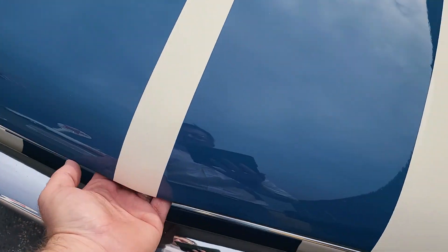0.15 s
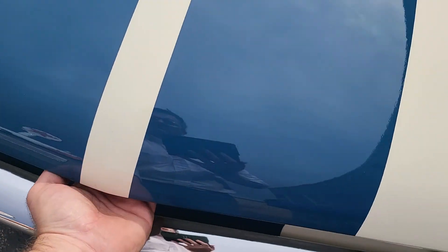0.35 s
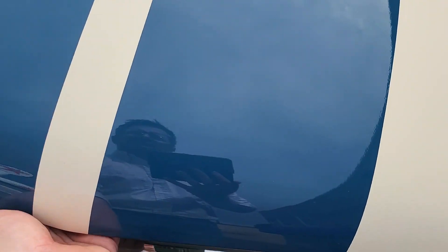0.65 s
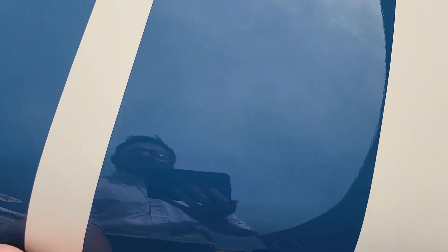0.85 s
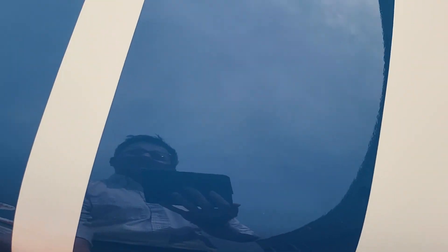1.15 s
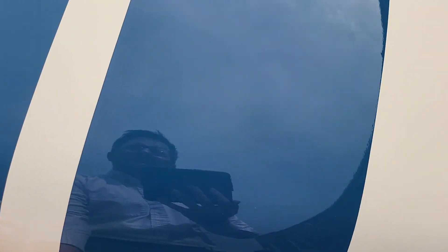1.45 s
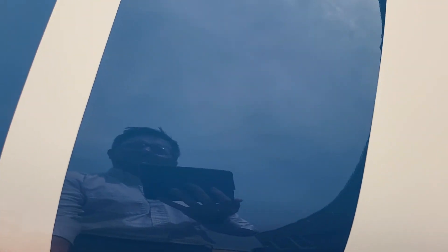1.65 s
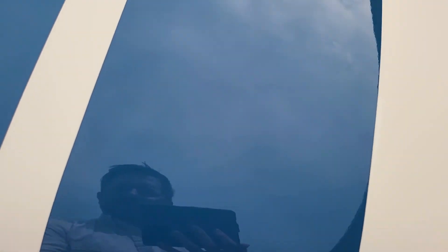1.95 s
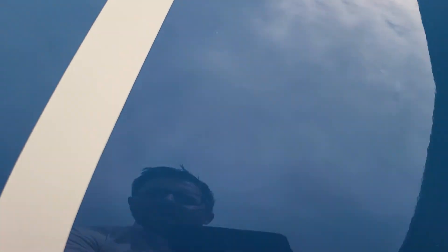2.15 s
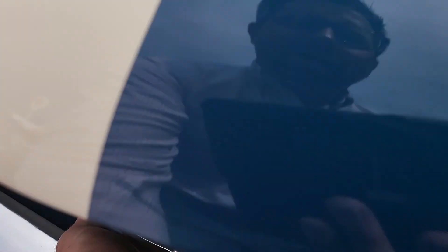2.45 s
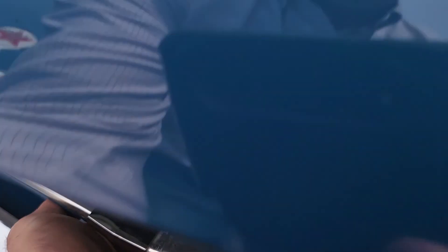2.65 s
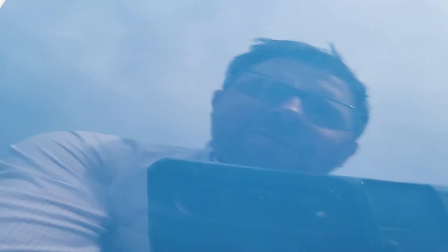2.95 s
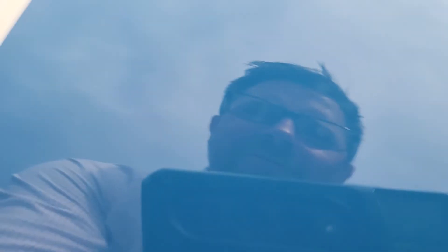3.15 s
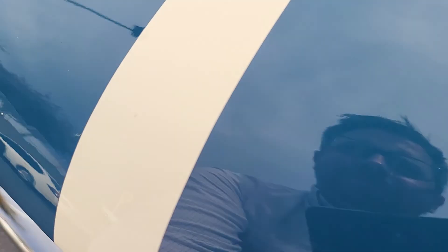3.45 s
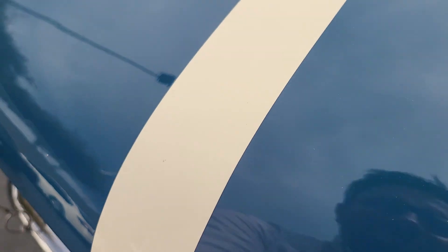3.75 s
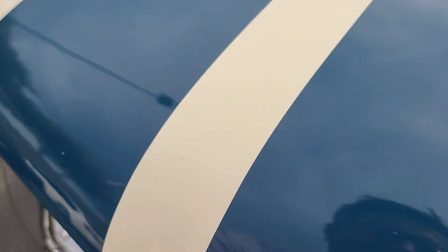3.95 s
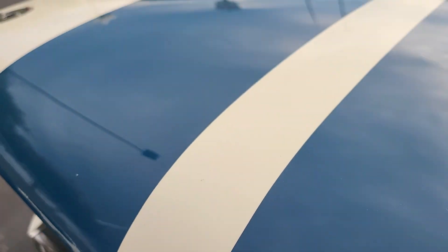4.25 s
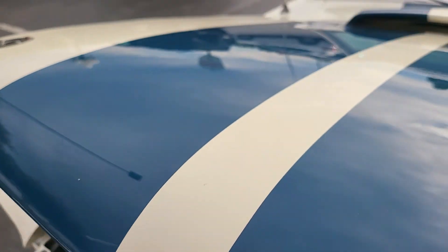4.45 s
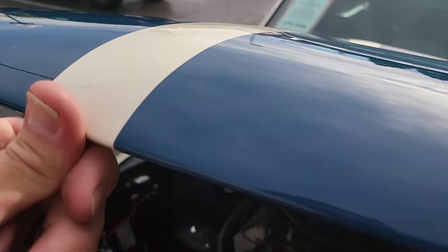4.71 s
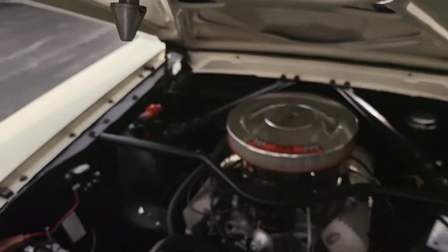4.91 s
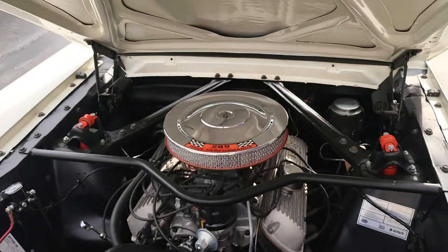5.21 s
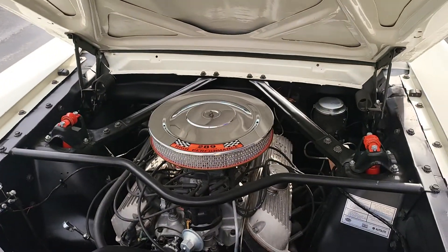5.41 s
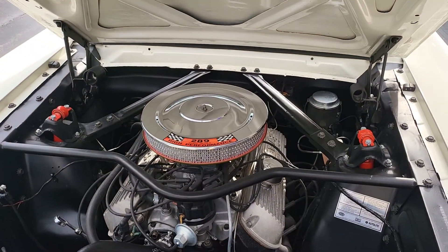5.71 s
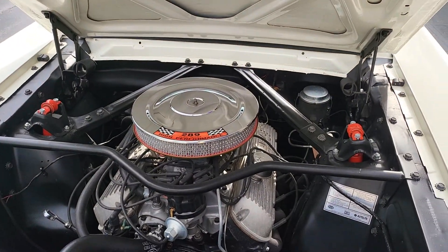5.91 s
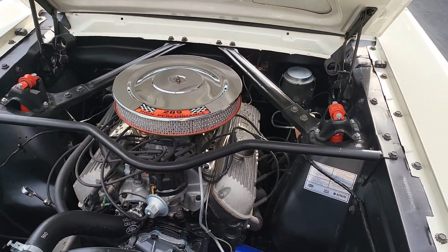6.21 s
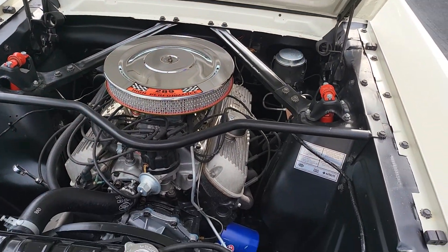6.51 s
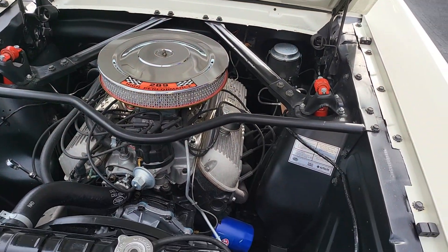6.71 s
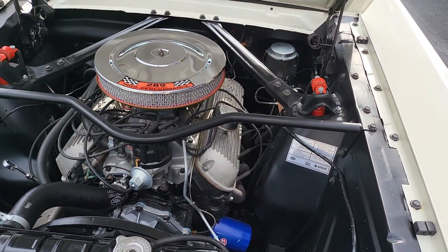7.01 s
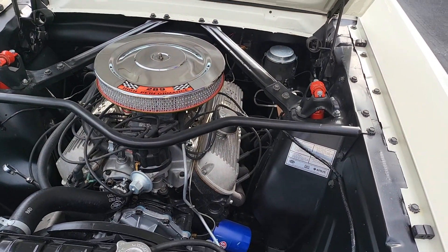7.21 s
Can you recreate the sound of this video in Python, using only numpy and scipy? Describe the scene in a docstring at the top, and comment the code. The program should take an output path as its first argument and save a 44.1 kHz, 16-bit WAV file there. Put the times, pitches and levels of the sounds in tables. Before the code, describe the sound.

Outdoors, a distant engine drones over faint traffic hiss and low wind rumble. Close to the microphone, fingers rub and scrape along a steel car hood with a few soft knocks. A cluster of loud, ringing clunks follows as the latch is worked. It squeaks faintly, then releases with a sharp metallic clack. Soft handling thumps accompany the lift, and one more ringing clunk sounds as the hood reaches the top.

```python
"""Outdoors, a hand feels under the edge of a steel car hood, works the latch and lifts the hood.
A distant engine drones over faint traffic hiss and low wind rumble. Fingers rub the metal, and low
thumps come through the hand and microphone. Each knock rings the big panel: a few clear tones over a
wash of crowded ones. Small latch parts ping when struck, and the latch squeaks as it sticks and slips."""
import sys
import numpy as np
from scipy import signal
from scipy.io import wavfile

SR = 44100
rng = np.random.default_rng(int(sys.argv[2]) if len(sys.argv) > 2 else 0)


def generate_wav(sig):
    """Save sig (samples, or channels by samples) to the path in sys.argv[1] as 16-bit PCM at SR."""
    pcm = np.round(np.clip(np.atleast_2d(sig).T, -1, 1) * 32767).astype(np.int16)
    wavfile.write(sys.argv[1], SR, pcm)


N = 325017
HOOD_FREE_S = 3.9   # the latch holds the hood until then; once free, it rings differently

# Knocks on latch and hood; weaker bursts just after the loud ones briefly hold the ringing level.
# start_s, thud_db, thud_octaves (above 100 Hz), click_db, click_treble_db, left_over_right_db, ring_factor
KNOCKS = [(0.425, -56, 1.4, -40.5, -19, 5, 0.33), (0.848, -25.5, 2, -48, -15, 1, 0.62),
          (1.091, -39.5, 1.8, -56, -11, 4.5, 1.06), (1.687, -56, 2.4, -49, -7, 4, 0.34),
          (1.79, -40, 3.3, -43, -25, 0, 0.63), (1.848, -52, 5.9, -43, -21, 1, .5),
          (2.439, -60, 1.1, -51.5, -1, 10, .09), (2.864, -21.5, 2, -29, -49, 1, 0.66),
          (2.999, -24.5, 1.18, -47, -43, 2, 1.07), (3.063, -19.5, 1.22, -68, -19, 0.5, 1.57),
          (3.174, -11, 1.9, -30, -14, 4, 0.64), (3.18, -11, 2.37, -18, -14, 2.5, 0.99),
          (3.2, -23.5, 1.9, -24, -36, -2, 0.88), (3.247, -25, 4.5, -31, -10, 3, 0.56),
          (3.275, -22, 0.33, -48.5, -29, -3.5, 1.3), (3.382, -31, .3, -36, 1, 0, 0.17),
          (3.415, -62, .4, -62, 2.1, 3, 0.086), (3.723, -23, 1.56, -40.5, -12, -2.5, 0.63),
          (3.9995, -14, 2.8, -8.5, -4, 2.5, 0.78), (4.019, -12, 0.94, -15, -29, 0.5, 0.97),
          (4.062, -19, 1.16, -30, -14, 3, 0.75), (4.106, -36, 0.86, -41.5, -8, 2, 1.36),
          (4.595, -50, 0.36, -49.5, -2.5, -2, 0.57), (4.897, -48.5, .3, -34.5, -22, 4.5, 0.22),
          (5.029, -64, .4, -62, 11, 2, .1), (5.779, -45.5, 2.7, -57.5, -21, 3, 0.27),
          (6.034, -19, 3.37, -39.5, -8, 2.5, 0.39), (6.049, -26.5, 3, -57, -22, -0.5, 1.55),
          (6.1, -32.5, 2.7, -60, -6, -1, 0.7), (6.139, -37.5, 2.9, -70, -12, 1, 0.79),
          (7.111, -52, 4.6, -46.5, -17, 1, .45)]
# How wide the hood sounds in stereo: pitch_hz, side_over_mid_db
HOOD_WIDTH = [(60, -5), (150, -17), (380, 0), (950, 5.5), (2380, 2.5), (5980, 0.5), (15000, 0)]


def from_db(db):
    """Turn decibels into a gain."""
    return 10 ** (np.asarray(db) / 20)


def rms_one(x):
    """Scale a signal to an average power of 1."""
    return x / np.sqrt(np.mean(x ** 2) + 1e-20)


def in_time(rows):
    """Join timed points with straight lines, giving one curve per column."""
    times_s, *columns = np.transpose(rows)
    return [np.interp(np.arange(N) / SR, times_s, column) for column in columns]


def at_hz(points, hz):
    """Look up a value by pitch, sliding between the listed pitches."""
    pitches_hz, values = np.transpose(points)
    return np.interp(np.log(hz), np.log(pitches_hz), values)


def drift(rate_hz):
    """A smooth random wobble, about 1 in size."""
    pole = np.exp(-80 * np.pi * rate_hz / SR)
    slow = signal.lfilter([1], [1, -2 * pole, pole * pole], rng.standard_normal(N // 40 + 2002))[2000:]
    return np.interp(np.arange(N) / 40, np.arange(len(slow)), rms_one(slow))


def spread(mid, side, side_db):
    """Make left and right from what they share (mid) and what sets them apart (side)."""
    share = from_db(side_db)
    return np.array([mid + share * side, mid - share * side])


def noise_bands():
    """Stereo noise in slices a third of an octave wide: centre_hz, width_hz, (mid, side)."""
    edges_hz = 22 * 2 ** np.arange(0, 9.8, 1 / 3)
    noise = rng.standard_normal((2, 2, N))   # neighbouring slices take different noise
    for k, (low, high) in enumerate(zip(edges_hz, edges_hz[1:])):
        band_filter = signal.butter(2, [low, high], "band", fs=SR, output="sos")
        yield np.sqrt(low * high), high - low, rms_one(signal.sosfilt(band_filter, noise[k % 2]))


def dying(t, fade_s, rise_s):
    """A quick rise, then a fall of 60 dB every fade_s."""
    return (1 - np.exp(-t / rise_s)) * from_db(-60 * t / fade_s)


def stereo_phase(hz):
    """A tone from the hood reaches the two microphones out of step: left and right shift in radians."""
    return np.arctan(from_db(at_hz(HOOD_WIDTH, hz))) * np.array([[1], [-1]])


def engine_drone():
    """A distant engine slowly gains speed; echoes along the way make its tone lumpy."""
    # The engine's loudness: time_s, level_db
    loudness = [(0, -38), (.55, -38), (.9, -40.5), (1.5, -34.5), (2.18, -35.5), (2.42, -39), (2.7, -41.5),
                (3.0, -34), (3.7, -37.5), (4.3, -35.5), (4.7, -36), (5.45, -34), (5.67, -33), (5.8, -29.5),
                (6.14, -42), (6.3, -37), (6.8, -39), (7.26, -36), (7.37, -49)]
    start_hz, rise_hz_per_s, wander_hz = 62.25, 0.99, 0.5
    level_db, = in_time(loudness)
    hz = start_hz + rise_hz_per_s * np.arange(N) / SR + wander_hz * drift(3.42)
    phase = 2 * np.pi * np.cumsum(hz) / SR + 0.075 * drift(9)
    gain = np.sqrt(2) * from_db(level_db + 1.5 * drift(17))
    return gain * np.sin(phase + np.array([[.15], [-.15]])) * from_db([[-1.1], [1.1]])


def traffic_and_wind():
    """Far traffic rumbles and hisses; low wind rumble on the microphone slowly dies away."""
    # The tone colour of traffic and wind: pitch_hz, relative_db
    colour = [(20, -25), (35, -15), (50, -10), (68, -3.5), (90, -12), (140, -24.5), (300, -37),
              (480, -49.5), (700, -33.5), (1050, -49.5), (1400, -45), (2600, -51.5), (5000, -59.5),
              (6500, -56.5), (8300, -86.5), (13000, -70), (16000, -81)]
    # How wide the surroundings sound in stereo: pitch_hz, side_over_mid_db
    stereo_width = [(60, -14), (150, -7.5), (380, -1.5), (950, 7), (2380, 0), (5980, 0.5), (15000, 1)]
    wind_below_hz, fade_db_per_s = 58, 1.2
    fade_db = fade_db_per_s * (N / 2 - np.arange(N)) / SR
    out = np.zeros((2, N))
    for hz, width_hz, (mid, side) in noise_bands():
        level_db = at_hz(colour, hz) - 34.5 + 0.44 * drift(20) + (hz < wind_below_hz) * fade_db
        out += from_db(level_db) * np.sqrt(width_hz / 30) * spread(mid, side, at_hz(stereo_width, hz))
    return out


def stroke_db(peak_s, rise_s, hold_s, fall_s):
    """One sliding move: climb 24 dB over rise_s, hold at 0 dB, then drop 24 dB every fall_s."""
    t = np.arange(N) / SR - peak_s
    before = np.maximum(-t, 0) / max(rise_s, .002)
    after = np.maximum(t - hold_s, 0) / max(fall_s, .002)
    return np.maximum(-24 * (before + after), -120)


def rub_levels():
    """The hand's overall level in dB, then its low, raspy and bright parts relative to that."""
    # The hand resting and shifting on the metal: time_s, level_db, low_part_db
    resting_hand = [(0, -59, 1), (.7, -62.5, 7.5), (.95, -63, 15.5), (1.2, -65.5, 18.5), (1.42, -65.5, 6),
                    (1.65, -61, 21), (1.95, -63.5, 13.5), (2.8, -61.5, 5.5), (2.93, -54, 19),
                    (3.0, -59.5, 11), (3.05, -55.5, 8), (3.09, -53.5, 9), (3.45, -57.5, 16),
                    (3.62, -70, 16.5), (3.9, -61, 7.5), (4.25, -62, 16), (4.5, -67, 12.5), (5.1, -69.5, 15),
                    (5.9, -69, 9.5), (6.25, -63.5, 15), (6.7, -63, 7.5), (7.37, -69.5, 13)]
    # Finger strokes: peak_s, rise_s, hold_s, fall_s, level_db, low_part_db, rasp_part_db, bright_part_db
    strokes = [(.056, 0.056, 0.0065, 0.19, -59, -2.5, -0.5, -22), (.432, 0.036, .01, 0.14, -54, 9, -2, -30),
               (1.102, 0.022, .005, .06, -49, 4, -5.5, -33),
               (1.478, 0.0399, 0.03, 0.051, -39, -1, -4, -11.5),
               (1.496, 0.0596, 0.061, 0.077, -34, .1, -9, -28),
               (1.696, .05, .02, 0.16, -50.5, -8, -0.5, -15), (1.808, 0.15, 0.06, .15, -52.5, 9, -7, -36),
               (2.224, 0.36, 0.025, 0.73, -49.5, 4.5, -4.5, -17), (2.66, .04, .02, .2, -54.5, 2, -7, -33),
               (3.031, 0.061, 0.019, .06, -48, 8, -5.5, -32), (3.446, .05, .07, 0.054, -64, 19, -10, -4),
               (3.742, 0.27, .015, .05, -52.5, 12, -13, -17),
               (4.61, 0.036, 0.0086, .06, -59, -8, -3, -10.5),
               (4.9, 0.057, 0.019, 0.079, -57.5, 6.5, 3.5, -22),
               (5.796, .07, .02, 0.099, -60.5, 2, -15.5, -30.5),
               (6.306, 0.076, 0.19, .15, -59, -1, -6.5, -21), (7.12, .05, .01, 0.067, -55.5, 7, -18, -33)]
    rest_db, rest_low_db = in_time(resting_hand)
    parts_db = [0, rest_low_db, -7.5, -26.5]   # overall, low, rasp, bright
    power = from_db([rest_db + part_db + 3 * drift(9) for part_db in parts_db]) ** 2
    for *timing, db, low, rasp, bright in strokes:
        power += from_db(stroke_db(*timing) + db + np.array([[0], [low], [rasp], [bright]])) ** 2
    level_db = 10 * np.log10(power)
    return level_db[0], *(level_db[1:] - level_db[0])


def finger_rubbing():
    """Skin sticks and slips on the steel, making a hiss; the panel sings softly under the fingers."""
    # The rubbing's tone colour: pitch_hz, relative_db
    colour = [(100, -30), (130, -4.5), (250, -1.5), (380, -2), (570, -12), (1000, -12), (1340, -13.5),
              (1700, -16), (2600, -18), (4800, -24), (6200, -23.5), (8300, -33), (16000, -28.5)]
    rub_db, low_db, rasp_db, bright_db = rub_levels()
    rub_db = rub_db + 0.9 * drift(90)   # sticking and slipping
    hiss = np.zeros((2, N))
    for hz, width_hz, (mid, side) in noise_bands():
        low = np.clip(np.log2(800 / hz), 0, 1)
        rasp = np.clip(np.log2(hz / 1800) * 2, 0, 1)
        bright = np.clip(np.log2(hz / 6500) * 3, 0, 1)
        tilt_db = low * (low_db - 3.5) + (rasp - bright) * (rasp_db + 4) + bright * (bright_db + 10)
        gain = from_db(rub_db + tilt_db + at_hz(colour, hz) + 8.5) * np.sqrt(width_hz / 1000)
        hiss += (hz > 110) * gain * spread(mid, side, at_hz(HOOD_WIDTH, hz))
    sing_hz, sing_width_hz = 1314, 87
    friction = from_db(rub_db) * rng.standard_normal((2, N))
    mid, side = rms_one(signal.lfilter(*signal.iirpeak(sing_hz, sing_hz / sing_width_hz, SR), friction))
    sing_gain = from_db(-6) * np.sqrt(np.mean(from_db(rub_db) ** 2))
    return hiss + sing_gain * spread(mid, side, at_hz(HOOD_WIDTH, sing_hz))


def low_thumps():
    """Soft pushes travel through hand and microphone, each a low tone that soon dies."""
    # The thumps: start_s, relative_db, pitch_hz, cycles_to_fade
    thumps = [(0.113, -26, 74, 5.4), (3.172, -8.5, 84.1, 18), (3.2, -9, 83.3, 15.5),
              (4.411, -14.5, 84.8, 4), (4.58, -24, 97, 5.4), (4.649, -28, 110.5, 6.4),
              (5.06, -19.5, 90.8, 4.6), (5.505, -31, 83, 20), (6.258, -26, 107.4, 4.6)]
    out, t = np.zeros((2, N)), np.arange(int(.4 * SR)) / SR
    for start_s, db, hz, cycles in thumps:
        at = round(start_s * SR)
        wave = np.sin(2 * np.pi * hz * t + np.array([[0.53], [-0.53]]))   # left and right out of step
        out[:, at:at + len(t)] += from_db(db + 7.5) * dying(t, cycles / hz, rise_s=0.45 / hz) * wave
    return out


def knock_db(hz, thud_db, thud_octaves, click_db, treble_db):
    """How strong a knock is at one pitch: the dull thud and the hard click add up."""
    click_hz, treble_hz = 3600, 11000
    from_thud, from_click = np.log2(hz / 100) - thud_octaves, np.log2(hz / click_hz)   # in octaves
    thud = thud_db + 4 * min(from_thud, 0) - max(from_thud, 0) * (8 + 2.5 * from_thud)
    treble_share = np.clip(from_click / np.log2(treble_hz / click_hz), 0, 1)
    click = click_db + 7 * min(from_click, 0) + treble_share * treble_db
    return 10 * np.log10(from_db(thud) ** 2 + from_db(click) ** 2)


def ring_scale(ring_factor, hz):
    """How much a knock stretches or shortens the ringing; high tones die sooner."""
    return max(ring_factor * at_hz([(500, 0.87), (4000, 0.67)], hz), .03)


def hood_wash():
    """A knock cracks on first contact and rings so many crowded panel tones that they blur into noise."""
    # How long the crowded tones ring: pitch_hz, base_fade_s
    fades = [(80, 0.66), (200, 0.42), (450, 0.21), (750, 0.33), (1400, 0.35), (4000, 0.34), (12000, 0.33)]
    # Their tone colour with the hood latched and free: pitch_hz, latched_db, free_db
    colour = [(60, -7, 2), (128, 7, 2), (212, -4, 0.5), (280.4, 4, 2), (400, -5.5, -3), (630, 4.5, -0.5),
              (854, -2.5, 1.5), (1300, 3.5, -2), (2070, 3, 0.5), (3300, -6.5, -5), (5100, -9.5, -7.5),
              (5560, 2.5, 1.5), (8140, -7.5, -10.5), (14000, 0.5, -1.5)]
    latched, free = np.array(colour)[:, [0, 1]], np.array(colour)[:, [0, 2]]
    out, t = np.zeros((2, N)), np.arange(int(.8 * SR)) / SR
    for hz, _, (mid, side) in noise_bands():
        if hz <= 55:
            continue
        lagging = np.roll(mid, round(SR / hz / 4))   # near sounds reach the two microphones out of step
        noise = spread(mid, 0.38 * lagging + 0.8 * side, at_hz(HOOD_WIDTH, hz))
        crack = (hz > 2000) * from_db(2.5) * dying(t, fade_s=0.013, rise_s=0.00021)
        for start_s, *blow, pan_db, ring_factor in KNOCKS:
            at = round(start_s * SR)
            level_db = knock_db(hz, *blow) + at_hz(free if start_s > HOOD_FREE_S else latched, hz) - 11
            fade_s = at_hz(fades, hz) * ring_scale(ring_factor, hz)
            shape = (dying(t, fade_s, rise_s=.0012 + .9 / hz) + crack)[:N - at]   # lows swell later
            gains = from_db([[level_db + pan_db / 2], [level_db - pan_db / 2]])
            out[:, at:at + len(shape)] += gains * shape * noise[:, at:at + len(shape)]
    return out


def hood_tones():
    """Each knock rings the panel's clearest tones, every one with a slightly random strength."""
    # The steel panel's own tones: pitch_hz, latched_db, free_db, base_fade_s
    tones = [(92, -12, 4, 0.27), (131.1, 2.5, -5.5, 0.6), (197.3, -8, 3, 0.81), (244.4, 6, -7.5, 0.25),
             (320.5, 2, 1.5, 0.58), (379.6, -0.5, 6, 0.33), (401.3, 5, -19.5, 0.42), (442, -6.5, -0.5, 0.5),
             (449, -7, -6.5, 0.86), (518.7, -41, 3.5, 0.23), (592, -12, -5.5, 0.61),
             (622, -0.5, -4.5, 0.52), (686, -10.5, -2, 0.69), (735, -1, -4, 0.57), (770, -34, 5, 0.26),
             (942.4, -9, 0.5, 0.36), (1018, 14.5, -7, 0.081), (1157, -4, -0.5, 0.36),
             (1297, 1.5, 4.5, 0.35), (1480, 3, 2.5, 0.35), (1793, -19, -22.5, 0.16), (1900, -20, -9, 0.45),
             (2424, -3, -4, 0.35)]
    out, ring_time = np.zeros((2, N)), np.arange(int(1.2 * SR)) / SR
    wobbles = [drift(31) for _ in tones]   # close neighbours make each tone waver
    for start_s, thud_db, thud_octaves, click_db, treble_db, pan_db, ring_factor in KNOCKS:
        at = round(start_s * SR)
        t = ring_time[:N - at]
        softness_db = 0.31 * min(thud_db - click_db, 24)   # soft knocks favour the clear tones
        for (hz, latched_db, free_db, base_fade_s), wobble in zip(tones, wobbles):
            tone_db = free_db - 9 if start_s > HOOD_FREE_S else latched_db - 13
            blow_db = knock_db(hz, thud_db, thud_octaves, click_db, treble_db)
            level_db = blow_db + tone_db + softness_db + 1.8 * rng.standard_normal()
            waver, shift = 0.69 * np.sqrt(hz / 600) * wobble[at:at + len(t)], stereo_phase(hz)
            wave = np.sin(2 * np.pi * hz * t + waver + shift) / np.cos(shift)
            shape = dying(t, base_fade_s * ring_scale(ring_factor, hz), rise_s=0.0056)
            gains = from_db([[level_db + pan_db / 2], [level_db - pan_db / 2]])
            out[:, at:at + len(t)] += gains * shape * wave
    return out


def latch_pings():
    """Small latch parts give a short, fluttering metal ring when struck."""
    # The pings: start_s, pitch_hz, level_db, fade_s
    pings = [(1.087, 3240, -45.5, 0.077), (1.851, 2600, -47, 0.13), (3.18, 6700, -37, 0.046),
             (3.183, 2916, -22, 0.15), (3.247, 2024, -19.5, 0.1), (3.247, 4940, -35, 0.072),
             (3.246, 5940, -23, 0.028), (3.258, 11500, -31.5, 0.047), (3.259, 13000, -43, 0.045),
             (4.0, 2550, -16.5, .12), (4.0, 6100, -18.5, .06), (4.0, 7040, -22, 0.043),
             (4.0, 15800, -17.5, .04), (4.001, 3780, -29, 0.16), (6.035, 3040, -36, 0.19),
             (6.035, 6150, -53, 0.21), (6.036, 3570, -42.5, 0.16)]
    out, t, flutter = np.zeros((2, N)), np.arange(int(.4 * SR)) / SR, 0.67 * drift(190)
    for start_s, hz, level_db, fade_s in pings:
        at = round(start_s * SR)
        wave = np.sqrt(2) * np.sin(2 * np.pi * hz * t + flutter[at:at + len(t)] + stereo_phase(hz))
        out[:, at:at + len(t)] += from_db(level_db) * dying(t, fade_s, rise_s=0.0018) * wave
    return out


def latch_squeak():
    """The latch sticks and slips, making a rough tone whose overtones are rougher still."""
    # The squeaks: peak_s, rise_s, hold_s, fall_s, level_db, pitch_hz
    squeaks = [(3.443, 0.028, .03, .02, -62, 2880), (3.514, .03, 0.0022, .03, -60, 2770),
               (3.673, 0.014, 0.0025, .07, -51, 2674), (3.722, 0.048, 0.021, .007, -45.5, 2560)]
    # The tones within a squeak: pitch_multiple, relative_db
    overtones = [(1, 0), (2.1, -12), (4.1, -26)]
    out, roughness = np.zeros(N), 0.54 * drift(160)
    partials = [(multiple, from_db(db + 2 * drift(110))) for multiple, db in overtones]
    for *timing, level_db, hz in squeaks:
        phase = 2 * np.pi * hz * np.arange(N) / SR + roughness
        wave = sum(gain * np.sin(multiple * phase) for multiple, gain in partials)
        out += from_db(level_db + stroke_db(*timing)) * wave
    return out


def scene():
    """Add up all the sounds in stereo."""
    return (engine_drone() + traffic_and_wind() + finger_rubbing() + low_thumps()
            + hood_wash() + hood_tones() + latch_pings() + latch_squeak())


def record(dry):
    """Round off the loudest peaks and cut the highest treble."""
    cutoff_hz = 16400
    rounded = 1.2 * np.tanh(dry / 1.2)
    return signal.sosfilt(signal.cheby2(14, 45, cutoff_hz, fs=SR, output="sos"), rounded)


dry = scene()
out = record(dry)
generate_wav(out)
```